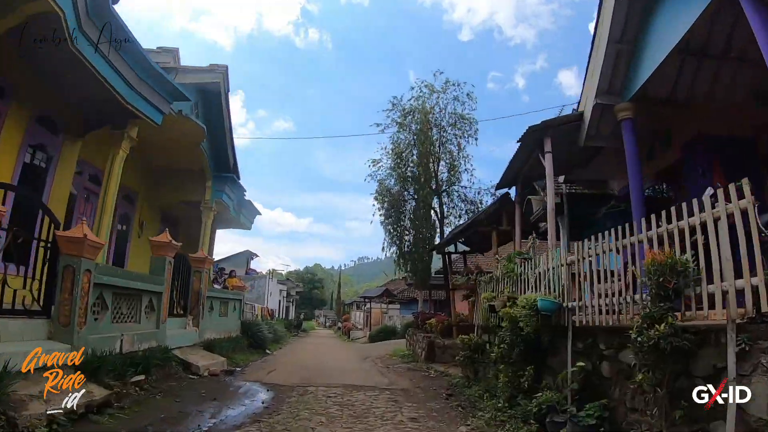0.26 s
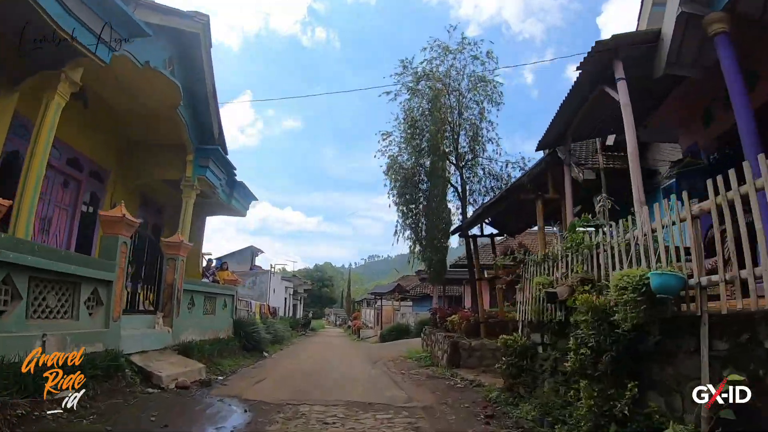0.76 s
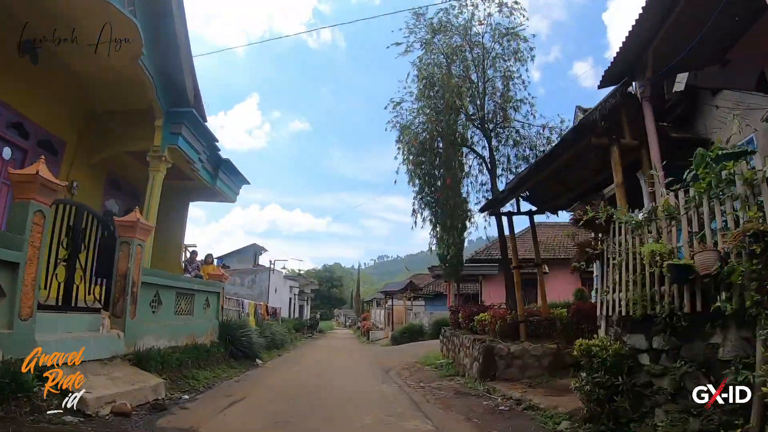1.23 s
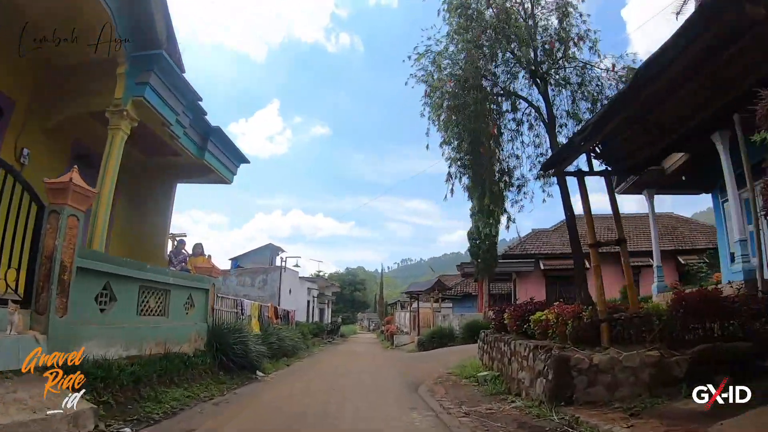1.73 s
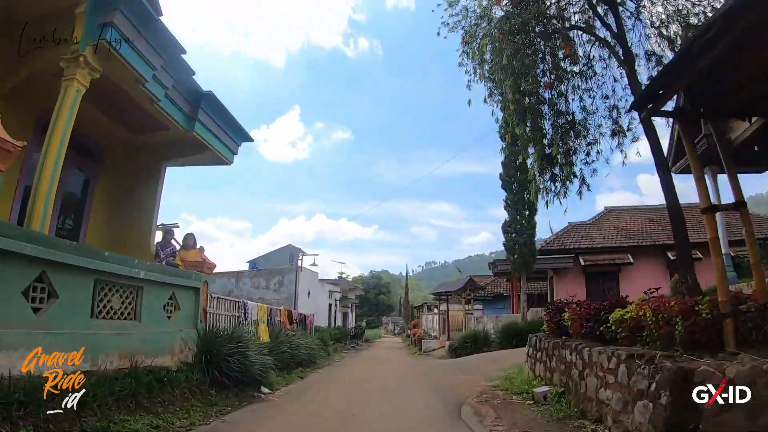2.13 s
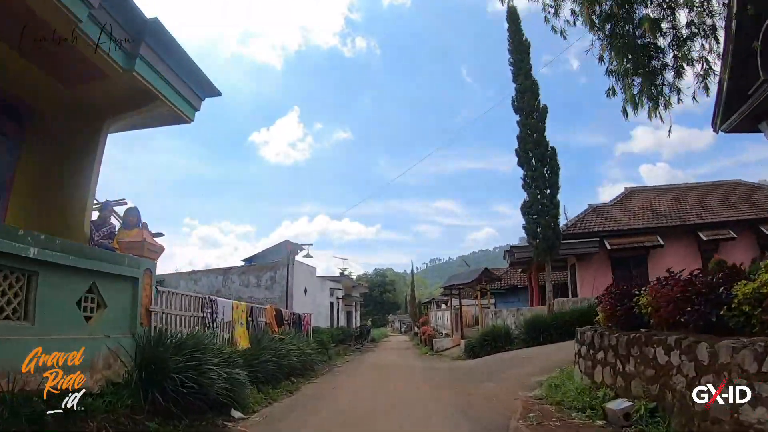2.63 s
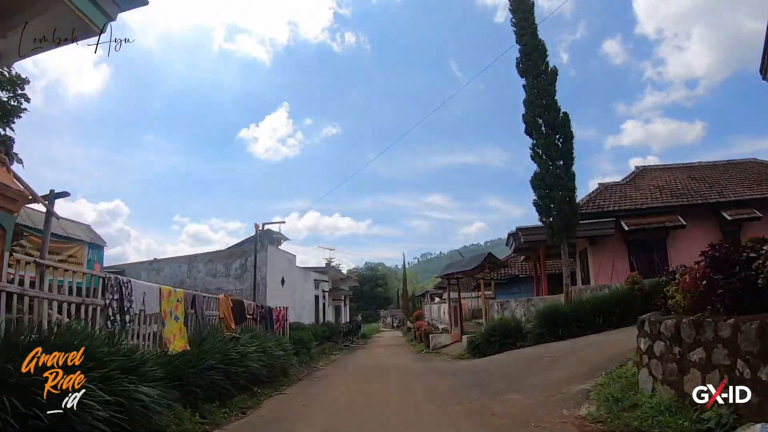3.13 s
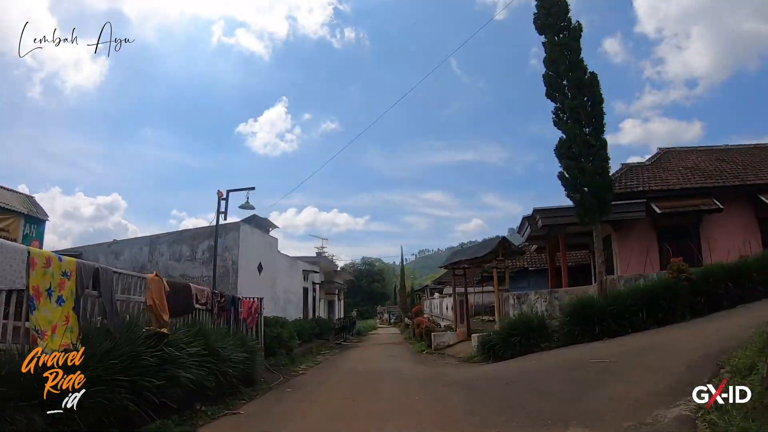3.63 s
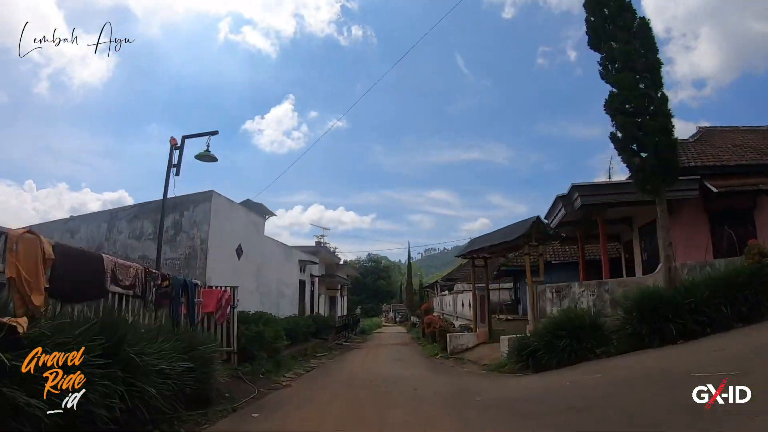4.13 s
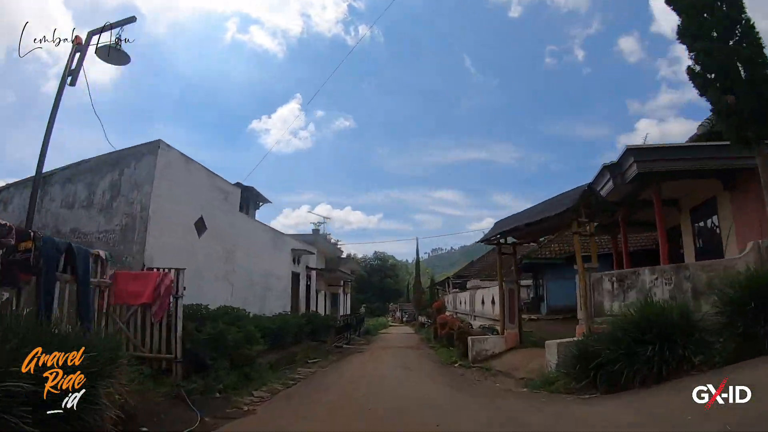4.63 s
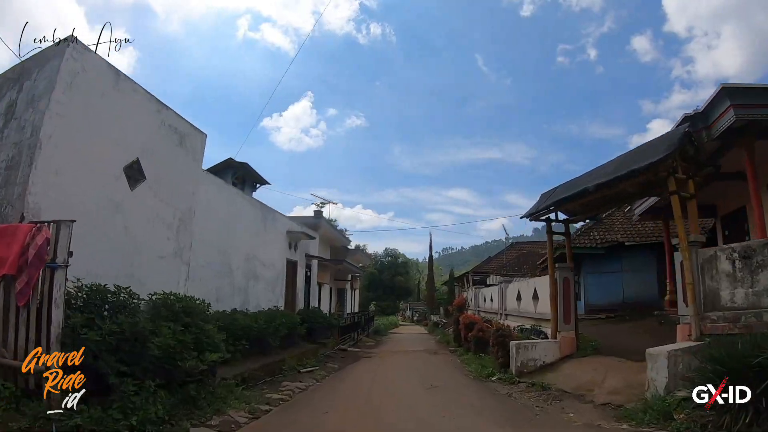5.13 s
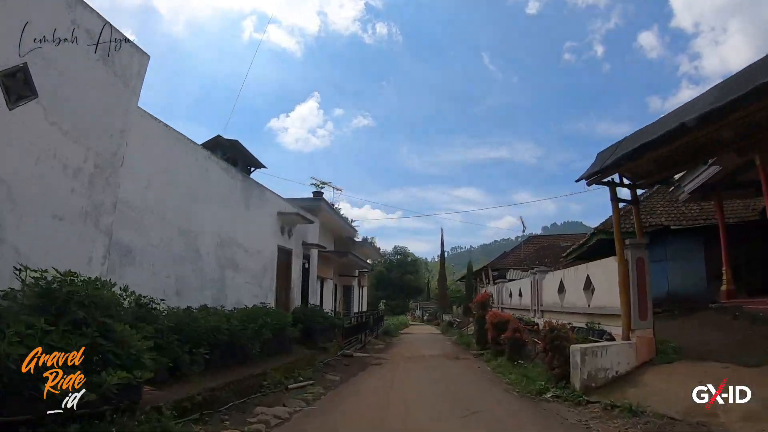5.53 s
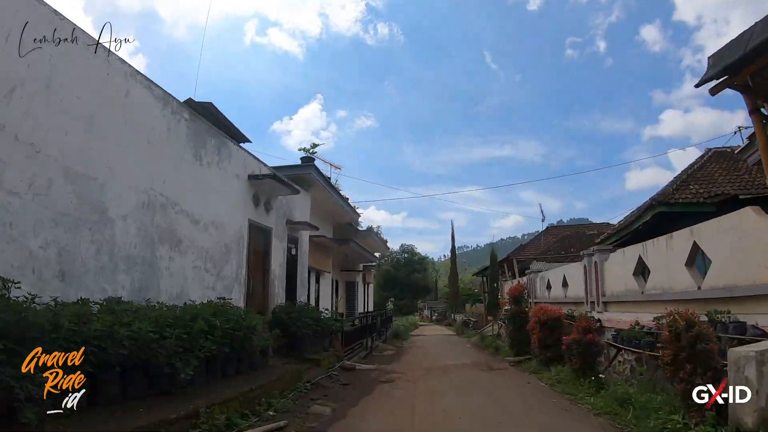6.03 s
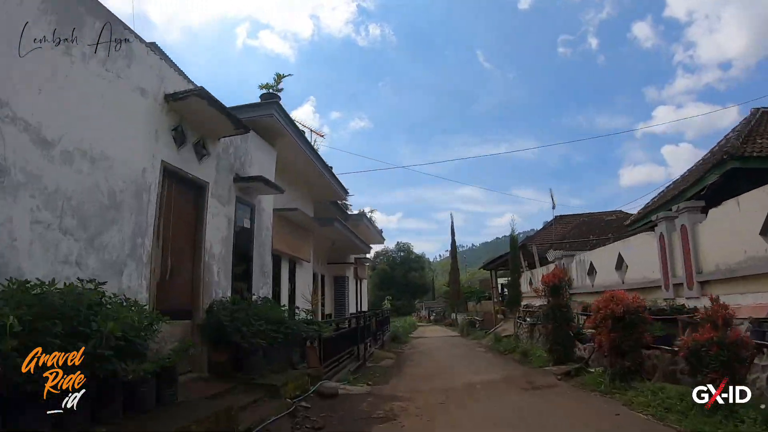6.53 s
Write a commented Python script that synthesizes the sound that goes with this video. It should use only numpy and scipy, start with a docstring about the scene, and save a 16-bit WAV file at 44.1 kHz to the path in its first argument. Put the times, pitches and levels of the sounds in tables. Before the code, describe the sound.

A bicycle coasts along a village lane, heard from a microphone on the bike. The freewheel's rapid metallic ticking buzz runs throughout, over tyre roar and low wind buffeting. For the first 2.3 seconds the bike pounds over cobbles: the frame knocks, the chain and fittings rattle, and a few small stones tick on metal before 1 second. The hardest jolts come around 2 seconds. By 2.7 seconds the rattle has faded into smoother packed dirt and the wind eases. From about 3 seconds the freewheel grows louder and gradually faster, and the gritty tyre roar swells by 4 seconds. The microphone mount gives low shudders, strongest between 4 and 5.5 seconds, and the wind returns from 4.5 seconds. A stone ticks at about 5.5 seconds, a short rough patch and knock follow near 6, and a faint wheel ring joins the buzz and strong wind at the end.

```python
"""Bicycle coasting down a village lane

A bike rolls over cobbles, then packed dirt, its freewheel buzzing faster as it gathers speed:
pawls drop off the ratchet teeth and ring the hub and wheel. Under the buzz the tyres roar, rough
patches pound and rattle the frame, and flung stones tick on metal. At the bottom, a camera mount
on the bike shudders at its own low note and wind buffets the microphone."""
import sys
import numpy as np
from scipy import signal
from scipy.fft import rfft, irfft, next_fast_len
from scipy.io import wavfile
from scipy.ndimage import uniform_filter1d

SR = 44100
rng = np.random.default_rng(int(sys.argv[2]) if len(sys.argv) > 2 else 0)


def digitize_waveform(pressure):
    """Quantize a signal to 16-bit integers and store it at the path in sys.argv[1].

    Rows of a 2-D input are taken as channels; values are limited to [-1, 1].
    """
    field = np.atleast_2d(pressure).T
    bounded = np.clip(field, -1, 1)
    quanta = np.round(bounded * 32767).astype(np.int16)
    wavfile.write(sys.argv[1], SR, quanta)


N = 298998
TIME = np.arange(N) / SR

# Levels in the tables are relative; the functions add their own trims.
# tone of the wind: freq_hz, level_db
WIND_EQ = [(6, -31), (18, -3.5), (30, -5), (55, -5), (78, 1), (100, -7.5), (125, -12.5), (150, -20),
           (190, -37.5), (400, -94)]
# fader ride of the wind on the microphone: time_s, level_db
WIND_RIDE = [(0, -16.5), (1.5, -16.5), (2.3, -15.5), (2.62, -23.5), (2.9, -20.5), (3.55, -26), (4.3, -25.5),
             (4.55, -18), (5.5, -15), (6.2, -16), (6.78, -12.5)]
# bumps that shake the camera mount harder: peak_s, level_db
MOUNT_BUMPS = [(0.07, -9.5), (0.31, -13), (0.77, -15), (1.25, -19), (1.72, -22), (2.1, -14), (2.54, -16.5),
               (2.75, -15.5), (3.19, -17), (3.43, -16), (4.07, -10), (4.24, -9), (4.5, -9.5), (4.7, -13),
               (4.88, -15.5), (5.18, -7.5), (5.38, -6.5), (5.6, -18), (5.95, -12), (6.6, -14)]

# fader ride of the tyres, louder on dirt as the bike speeds up: time_s, rumble_db, roar_db
TYRE_RIDE = [(0, -27.5, -29.5), (0.5, -27.5, -33.5), (0.8, -28, -31), (1.55, -29.5, -34.5),
             (2.3, -28, -33.5), (2.65, -29.5, -33), (3.2, -28, -28), (3.95, -23, -22), (5.0, -24, -23.5),
             (5.25, -21, -24), (5.55, -23, -25), (6.15, -24, -25.5), (6.4, -21.5, -26),
             (6.78, -24.5, -24.5)]
# low body of the tyre casing: pitch_hz, width_hz, level_db
CASING_MODES = [(227.4, 58.6, 4.5), (291.3, 50, -1.5), (394.6, 106, 2), (504, 130, -9.5)]
# midrange body of the frame: pitch_hz, width_hz, level_db
FRAME_MODES = [(581.6, 101, 1), (726, 95, 0), (820, 81, -6.5), (964, 108, -1.5), (1056, 48, -7)]
# tone of grit under the tread: freq_hz, level_db
GRIT_EQ = [(200, -5.5), (500, 2), (1000, 2.5), (1300, -4), (2000, -1), (2600, -4.5), (3400, -9),
           (5000, -18.5), (9000, -23), (15000, -17.5)]

# patches of rough ground: start_s, length_s, strength_db, extra_rattle_db
ROUGH_PATCHES = [(-0.03, 0.2, -13.5, 10), (0.176, 0.25, -0.5, 2), (0.623, 0.09, 1.5, -2),
                 (0.907, 0.22, -4, -4), (1.244, 0.18, 0.5, -1), (1.624, 0.11, -3, 1),
                 (1.767, 0.36, -7.5, -2), (1.94, 0.099, -3.5, 6), (2.154, 0.066, -5, -8),
                 (2.249, 0.088, -10, 13.5), (5.864, 0.163, -4, 0)]
# tone of the loose parts: freq_hz, level_db
RATTLE_EQ = [(300, 17), (750, -15), (1250, 6), (2000, -1), (2600, 5), (3400, -1.5), (4200, -3.5),
             (4800, -9), (5700, -9.5), (7600, -16), (10000, -26), (14000, -34)]
# tone of a stone knocking the frame: freq_hz, level_db
KNOCK_EQ = [(120, -4), (250, 15.5), (450, 14.5), (750, 4), (1200, 0.5), (1800, -0.5), (2500, -31),
            (4000, -34), (9000, -65)]
# hits from larger stones: start_s, level_db, brightness_db
JOLT_HITS = [(0.214, -32, -5), (0.301, -19, -11), (0.325, -25, -18), (0.533, -21, -12), (0.671, -19, -8.5),
             (0.691, -14.5, -33), (1.047, -27, -20), (1.294, -21, -11), (1.317, -18, -22),
             (1.346, -28, -21), (1.382, -16.5, -27), (1.691, -13, -26), (1.741, -17.5, -23),
             (1.834, -14, -22), (1.921, -8, -23), (1.96, -18, -21), (1.988, -11.5, -37),
             (2.009, -12, -17.5), (2.173, -12.5, -42), (6.084, -11.5, -32)]
# hits from small flung stones: start_s, level_db
TICK_HITS = [(0.567, -29.5), (0.82, -26.5), (0.92, -30), (5.548, -19.5)]
# ring of the metal they strike: pitch_hz, width_hz, level_db
METAL_MODES = [(2390, 140, -9), (2580, 67, -0.5), (3120, 150, -11), (3340, 160, 2), (4200, 150, -8),
               (3930, 180, -30)]
# spells in which one resonance sings out: start_s, end_s, pitch_hz, width_hz, level_db
RING_SWELLS = [(5.805, 6.088, 1930, 120, -31.5), (6.1, 7.2, 3130, 35, -37.5)]

# speed of the ratchet, in teeth passed per second: time_s, rate_hz
TOOTH_RATE = [(0.0, 49.16), (0.62, 38.28), (0.82, 45.32), (1.18, 46.71), (1.7, 44.94), (2.03, 48.16),
              (2.2, 40.86), (2.62, 40.07), (3.0, 57.95), (3.13, 37.72), (3.26, 47.6), (4.54, 54.32),
              (4.66, 58.83), (4.83, 54.2), (4.96, 62.03), (5.09, 57.27), (5.37, 68.88), (5.66, 60.96),
              (5.87, 63.32), (6.1, 59.38), (6.29, 65.57), (6.78, 66.51)]
# fader ride of the whole freewheel: time_s, level_db
FREEWHEEL_RIDE = [(0, -33.5), (0.5, -36), (1.0, -35.5), (1.6, -38.5), (2.45, -38.5), (2.98, -31),
                  (3.13, -33), (3.42, -28.5), (3.68, -29.5), (3.9, -27), (5.0, -26.5), (5.7, -28.7),
                  (6.15, -29), (6.4, -27.5), (6.78, -28)]
# hub ring and bright pawl snap against that ride: time_s, hub_db, snap_db
BRIGHTNESS_RIDE = [(0, -10, -16), (0.9, -5.5, -16), (2.8, -4.5, -14), (4.15, -5, -13), (4.8, -5.7, -13.5),
                   (5.6, -5.5, -16), (6.78, -4.5, -15.3)]
# midrange ring of the wheel: pitch_hz, width_hz, level_db
WHEEL_MODES = [(1229, 104, -4.5), (1438, 74, 2.5), (1500, 430, -24.5), (1855, 64, 1.5), (1970, 104, -6),
               (1940, 88, -12)]
# bright ring of hub, spokes and frame: pitch_hz, width_hz, level_db
HUB_MODES = [(2356, 69, -1), (2576, 225, -4.5), (2809, 115, 4.5), (2948, 120, -2), (3177, 38, 3.5),
             (3420, 72, -21), (3670, 190, -9.5), (4018, 79, -2.5), (4336, 213, -7), (4092, 176, -8.5),
             (4610, 80, -11)]
# top-end zing of the pawls: pitch_hz, width_hz, level_db
PAWL_MODES = [(5160, 130, -4.5), (5570, 240, -7), (5857, 175, -2.5), (6200, 520, -14), (7060, 250, -6.5),
              (7420, 163, 0), (7850, 540, -11), (8440, 100, -0.5), (8650, 184, -0.5), (9160, 91, -14.5),
              (9650, 150, -8), (10470, 610, -17.5)]
# tone of a pawl's dry click: freq_hz, level_db
CLICK_EQ = [(300, -32.5), (800, -3), (1900, -1), (3000, -0.5), (5000, -16.5)]


def amp(db):
    """Decibels to gain."""
    return 10 ** (np.asarray(db) / 20)


def unit(x):
    """Scales to rms 1."""
    return x / np.sqrt(np.mean(x ** 2) + 1e-20)


def curves(rows):
    """One automation curve for each value column of a timed table."""
    times, *columns = np.transpose(rows)
    return [np.interp(TIME, times, column) for column in columns]


def add(mix, start_s, sound):
    """Lays a sound into the mix."""
    part = mix[max(round(start_s * SR), 0):][:len(sound)]
    part += sound[:len(part)]


def eq(x, points):
    """Minimum-phase EQ through (freq_hz, level_db) points."""
    hz, db = np.transpose(points)
    freqs = abs(np.fft.fftfreq(2 ** 14, 1 / SR))
    log_gain = np.log(amp(np.interp(np.log(freqs + 1), np.log(hz), db)))
    response = np.fft.ifft(np.exp(np.conj(signal.hilbert(log_gain)))).real
    return signal.oaconvolve(x, response[:len(freqs) // 2])[:len(x)]


def resonate(x, hz, width_hz):
    """One mode, with gain 1 at its centre."""
    radius = np.exp(-np.pi * width_hz / SR)
    pole = radius * np.exp(2j * np.pi * hz / SR)
    return 2 * signal.lfilter([1 - radius], [1, -pole], x).real


def body(x, modes):
    """Drives a set of modes, each filtered twice so the valleys between them stay dark."""
    return unit(sum((-1) ** k * amp(db) * resonate(resonate(x, hz, width), hz, width)
                    for k, (hz, width, db) in enumerate(modes)))


def wander(hz):
    """Smooth random drift of rms 1, rolled off above hz."""
    size = next_fast_len(N, True)
    freqs = np.fft.rfftfreq(size, 1 / SR)
    spectrum = rfft(rng.standard_normal(size)) * np.exp(-(freqs / hz) ** 2)
    return unit(irfft(spectrum, size)[:N])


def steady(x, window_s):
    """Leveller: holds a sound near rms 1 and leaves its fine grain."""
    size = max(int(window_s * SR), 2)
    power = uniform_filter1d(uniform_filter1d(x ** 2, size), size)
    return x / np.sqrt(abs(power) + 1e-12)


def grains(per_s, spread_db):
    """Random small impacts, a few of them large."""
    size = amp(spread_db * np.minimum(rng.exponential(1, N), 4))
    return size * (rng.random(N) < per_s / SR)


def crunch(blows, decay_s):
    """Each blow breaks into a brief burst of tiny contacts."""
    energy = signal.lfilter([1], [1, -np.exp(-2 / (decay_s * SR))], blows ** 2)
    return np.sqrt(energy) * rng.standard_normal(N)


def burst(x, t, decay_s):
    """Shapes noise into a hit with a softened attack and a dying tail."""
    envelope = np.exp(-t / decay_s) * (1 - np.exp(-(t / .0009) ** 2))
    return unit(x * envelope) * np.sqrt(np.mean(envelope ** 2))


def roughness(rattle=False, rise_s=.023, fall_s=.026):
    """How hard the ground works the bike, or its loose parts: each patch rises, holds and falls."""
    out = np.zeros(N)
    for start, length, db, extra_rattle_db in ROUGH_PATCHES:
        ramps = np.minimum((TIME - start) / rise_s, (start + length - TIME) / fall_s)
        out += amp(db + rattle * extra_rattle_db) * np.clip(ramps, 0, 1)
    return out


def roughened(level_db, patch_db, rattle=False):
    """Gain of a layer that runs at its own level and swells on rough patches."""
    return np.hypot(amp(level_db), amp(patch_db) * roughness(rattle))


def wind():
    """Eddies thump on the microphone port, harder when rough ground throws the camera about."""
    wind_db, = curves(WIND_RIDE)
    eddies = steady(eq(rng.standard_normal(N), WIND_EQ), .085)
    flutter_db = wander(hz=10)
    return roughened(wind_db + flutter_db, patch_db=-10) * eddies


def mount_shudder(pitch_hz=114, floor_db=-18, bump_half_s=.057):
    """The road shakes the camera mount: a low note that wavers and swells at every bump."""
    bumps = sum(amp(db) * np.exp(-((TIME - peak_s) / bump_half_s) ** 2) for peak_s, db in MOUNT_BUMPS)
    phase = 2 * np.pi * pitch_hz * TIME
    shake = wander(hz=19.5) * np.cos(phase) + wander(hz=9.1) * np.sin(phase)
    lowpass = signal.butter(6, 140, fs=SR, output="sos")
    return signal.sosfiltfilt(lowpass, np.hypot(amp(floor_db), bumps) * steady(shake, .063))


def tyres():
    """The tread drums on casing and frame and crushes grit; the ratchet throbs in the frame too."""
    rumble_db, roar_db = curves(TYRE_RIDE)
    rate_hz, = curves(TOOTH_RATE)
    tooth_phase = 2 * np.pi * np.cumsum(rate_hz) / SR
    throb = amp(1.9 * np.cos(tooth_phase) + 2.65 * np.cos(2 * tooth_phase))
    grit = unit(crunch(grains(per_s=700, spread_db=1), decay_s=.00073))
    rumble = steady(body(rng.standard_normal(N), CASING_MODES), .29)
    roar = steady(throb * body(grit + .35 * rng.standard_normal(N), FRAME_MODES), .05)
    hiss = unit(eq(grit + rng.standard_normal(N), GRIT_EQ))
    tread = amp(-7) * roar + amp(-8) * hiss
    return amp(rumble_db - 4.5) * rumble + roughened(roar_db, patch_db=-32) * tread


def cobble_rattle(fade_start_s=2.11, fade_s=.61):
    """Chain, cables and fittings chatter and ring the wheel until the cobbles give way to dirt."""
    on_cobbles = np.clip(1 - (TIME - fade_start_s) / fade_s, 0, 1)
    chatter = unit(crunch(grains(per_s=500, spread_db=5.5), decay_s=.0055))
    rattle = unit(eq(chatter, RATTLE_EQ)) + amp(-12) * body(chatter, WHEEL_MODES[:1])
    return roughened(level_db=-37, patch_db=-30.5, rattle=True) * on_cobbles * steady(rattle, .018)


def pounding(bounce_hz=30.4):
    """On a rough patch stone after stone knocks the frame, and the bike bounces on its tyres."""
    stones = crunch(grains(per_s=300, spread_db=5), decay_s=.013)
    knocks = amp(-27.5) * steady(eq(stones, KNOCK_EQ), .05)
    bounce = amp(-14.5) * steady(body(rng.standard_normal(N), [(bounce_hz, 25, 0)]), .047)
    return roughness() * (knocks + bounce)


def jolts():
    """Larger stones knock the frame and make its loose parts clack."""
    t, out = np.arange(SR // 8) / SR, np.zeros(N)
    for start_s, db, brightness_db in JOLT_HITS:
        knock = burst(eq(rng.standard_normal(len(t)), KNOCK_EQ), t, decay_s=.0092)
        clack = burst(eq(rng.standard_normal(len(t)), RATTLE_EQ), t, decay_s=.018)
        add(out, start_s, amp(db - 2) * (knock + amp(brightness_db + 8) * clack))
    return out


def stone_ticks():
    """A small stone flicks a metal part: a dry crack with a short ring."""
    t, out = np.arange(SR // 10) / SR, np.zeros(N)
    ring = sum(amp(db) * np.exp(-np.pi * width * t) * np.sin(2 * np.pi * (hz * t + rng.random()))
               for hz, width, db in METAL_MODES)
    crack = amp(-17) * burst(eq(rng.standard_normal(len(t)), RATTLE_EQ), t, decay_s=.0046)
    for start_s, db in TICK_HITS:
        add(out, start_s, amp(db) * (ring + crack))
    return out


def wheel_swells():
    """Late in the ride, single resonances of the wheel swell up and sing out."""
    out = np.zeros(N)
    for start, end, hz, width, db in RING_SWELLS:
        arch = np.sin(np.pi * np.clip((TIME - start) / (end - start), 0, 1))
        ring = steady(body(rng.standard_normal(N), [(hz, width, 0)]), .024)
        out += amp(db) * arch * ring
    return out


def pawl_drops(teeth_s, lead_s, stagger_s, jitter_s, uneven_db, pawls=3):
    """At every tooth the pawls drop one just after another, never quite alike."""
    chance = rng.standard_normal((len(teeth_s), 2 * pawls + 1))
    timing, per_pawl, per_tooth = np.split(chance, [pawls, 2 * pawls], axis=1)
    drop_s = teeth_s[:, None] - lead_s + stagger_s * np.arange(pawls) + jitter_s * timing
    force = amp(uneven_db * (per_pawl + per_tooth))
    drops = np.zeros(N)
    np.add.at(drops, np.clip(np.round(drop_s * SR).astype(int), 0, N - 1), force)
    return drops


def freewheel():
    """The lead sound: pawls scrape up each tooth, drop, and ring the hub and the wheel."""
    rate_hz, = curves(TOOTH_RATE)
    level_db, = curves(FREEWHEEL_RIDE)
    hub_db, snap_db = curves(BRIGHTNESS_RIDE)
    teeth_passed = np.floor(np.cumsum(rate_hz) / SR)
    teeth_s = TIME[1:][np.diff(teeth_passed) > 0]
    sway = amp(1.5 * wander(hz=8.4))

    # every drop shares its force differently among wheel, hub and pawl
    wheel_hits = pawl_drops(teeth_s, lead_s=.0051, stagger_s=.0011, jitter_s=.0004, uneven_db=.9)
    drive = unit(wheel_hits) + .6 * unit(crunch(wheel_hits, decay_s=.002)) + .15 * rng.standard_normal(N)
    wheel = amp(-4) * steady(body(drive, WHEEL_MODES), .04)
    click = amp(-12.5) * unit(eq(wheel_hits, CLICK_EQ))

    hub_hits = pawl_drops(teeth_s, lead_s=.0044, stagger_s=.001, jitter_s=.0003, uneven_db=2.1)
    strike = unit(hub_hits) + .6 * unit(crunch(hub_hits, decay_s=.0012))
    hub = amp(hub_db) * steady(body(strike + .12 * rng.standard_normal(N), HUB_MODES), .04)

    # the pawls already zing as they slide off the tip of the tooth
    slides = pawl_drops(teeth_s, lead_s=.0051, stagger_s=.00096, jitter_s=.00018, uneven_db=2.5)
    scrape = .82 * unit(crunch(slides, decay_s=.003)) + .3 * rng.standard_normal(N)
    zing = body(.4 * strike + scrape, PAWL_MODES)
    edge = amp(-24) * unit(np.diff(strike, prepend=0))
    snap = amp(snap_db) * steady(zing + edge, .031)
    return amp(level_db) * (click + sway * (wheel + hub + snap))


def scene():
    """The mono mix, heard from the bike."""
    road = tyres() + cobble_rattle() + pounding() + jolts() + stone_ticks()
    return (freewheel() + wheel_swells() + road + mount_shudder() + wind())[None]


def record(dry):
    """The camera housing dulls the top octave, big peaks soft-clip, and a steep high cut follows."""
    dulled = eq(dry[0], [(100, 1), (10400, -.5), (11100, -13.5), (13800, -19.5), (15500, -26.5)])
    clipped = dulled / (1 + dulled ** 8) ** (1 / 8)
    high_cut = signal.firwin(511, 15800, window=("kaiser", 9), fs=SR)
    return signal.oaconvolve(clipped, high_cut, "same")[None]


dry = scene()
out = record(dry)
digitize_waveform(out)
```